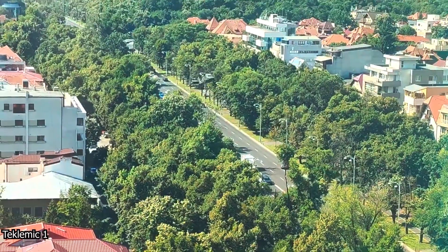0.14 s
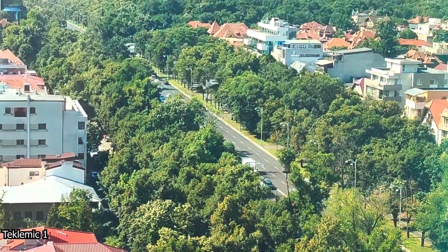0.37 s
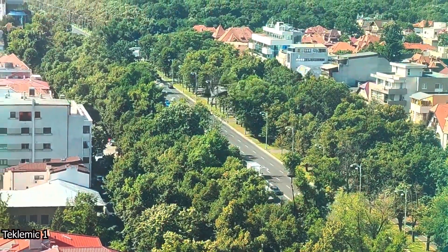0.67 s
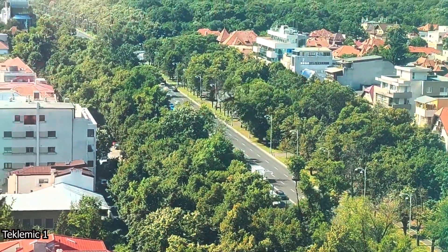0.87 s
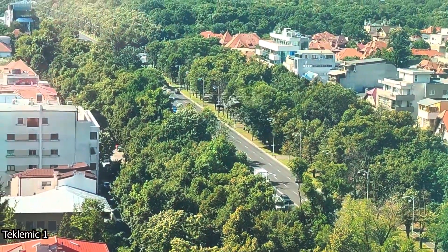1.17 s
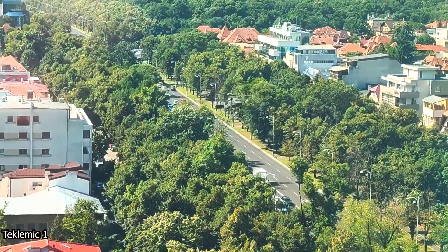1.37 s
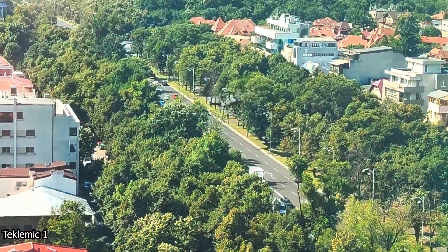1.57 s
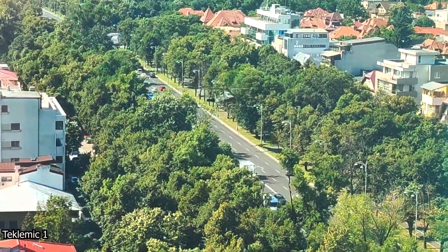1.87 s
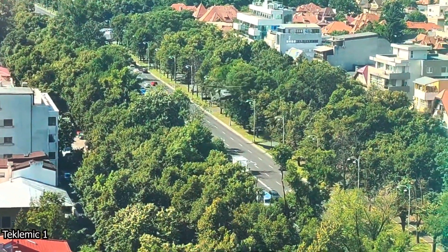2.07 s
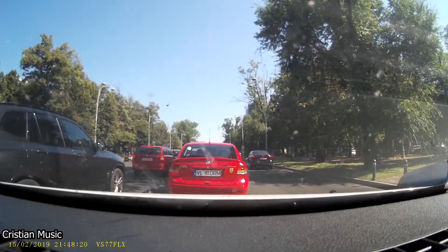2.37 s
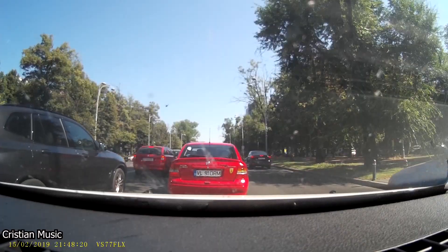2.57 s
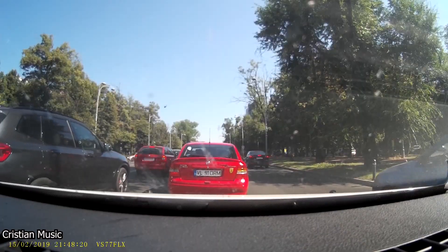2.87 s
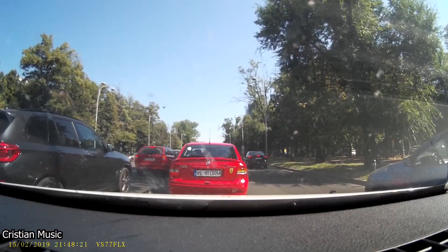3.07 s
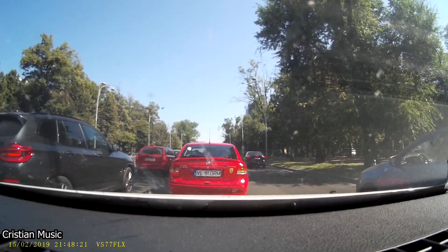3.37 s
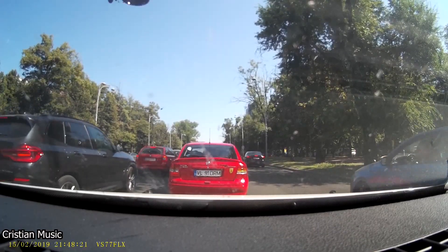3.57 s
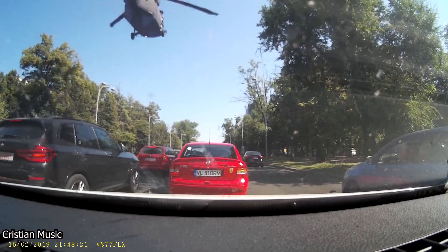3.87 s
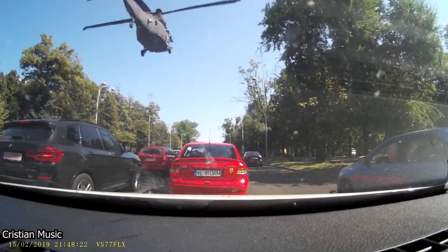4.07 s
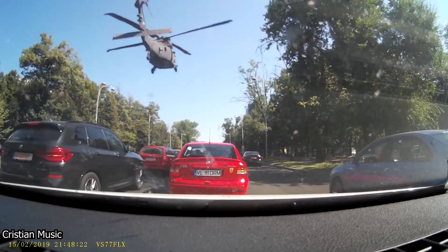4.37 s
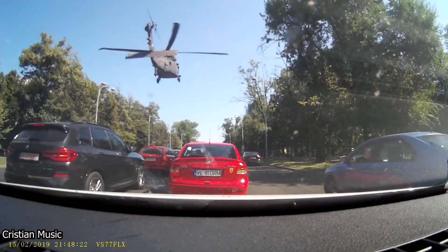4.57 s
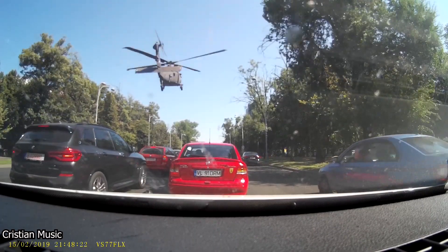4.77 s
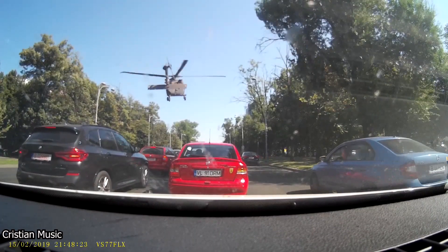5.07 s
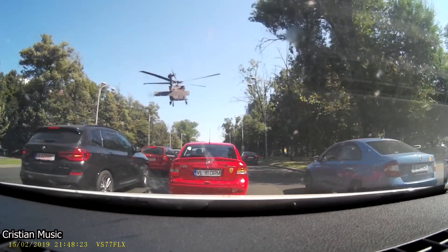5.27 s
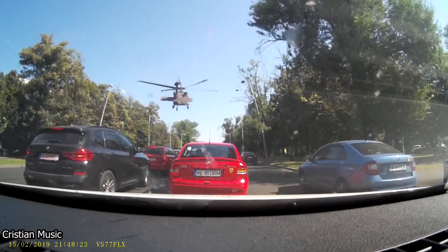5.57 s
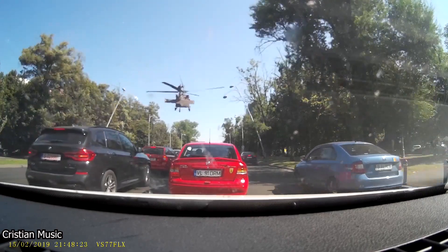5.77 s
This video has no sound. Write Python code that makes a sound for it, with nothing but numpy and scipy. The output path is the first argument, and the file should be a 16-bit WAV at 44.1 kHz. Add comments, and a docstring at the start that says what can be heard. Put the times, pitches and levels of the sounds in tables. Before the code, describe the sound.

From a high balcony, a soft low helicopter drone wavers over wide, quiet city hush, with a small click or two near the microphone. A hard cut jumps inside a car: very loud, rapid blade slaps and deep cabin boom overhead, with turbine whine and a swelling hiss of downwash. The machine passes and fades into duller rumble with faint high chirps and late crackles.

```python
"""A helicopter flies low over a tree-lined street: a far drone over city hush, then a hard cut to a close pass.
The far part is stereo, from a balcony: wavering sines for drone and whistle, shaped noise for hush, clicks.
The near part is mono, inside a car, as the machine passes overhead and recedes: sine orders for thump and tail
rotor, short ringing pulses for blade slap, blade-pushed noise for rumble, roar and turbine whine,
swelling noise for gusts of hiss, and short chirps for squeaks."""
import sys
import numpy as np
from scipy import signal
from scipy.io import wavfile
from scipy.ndimage import uniform_filter1d

SR = 44100
rng = np.random.default_rng(int(sys.argv[2]) if len(sys.argv) > 2 else 0)


def generate_wav(sig):
    """Save sig (samples, or channels by samples) to the path in sys.argv[1] as 16-bit PCM at SR."""
    pcm = np.round(np.clip(np.atleast_2d(sig).T, -1, 1) * 32767).astype(np.int16)
    wavfile.write(sys.argv[1], SR, pcm)


N = 262042
CUT_S = 2.2735  # the far part gives way to the car


def gain_of(db):
    """Decibels to gain."""
    return 10 ** (np.asarray(db) / 20)


def evened(x):
    """Scales to rms 1."""
    return x / np.sqrt(np.mean(x ** 2) + 1e-20)


def peaked(x):
    """Scales to peak 1."""
    return x / np.max(abs(x))


def read(points, hz):
    """Reads a spectrum on a log-frequency axis."""
    f, value = np.transpose(points)
    return np.interp(np.log(hz + 1), np.log(f + 1), value)


def columns(rows):
    """Every column of a curve table at every sample."""
    s, *cols = np.transpose(rows)
    return [np.interp(np.arange(N) / SR, s, c) for c in cols]


def add(mix, s, sound):
    """Adds a sound at a time in seconds."""
    part = mix[round(s * SR):][:len(sound)]
    part += sound[:len(part)]


def drift(hz):
    """Random wander of rms 1, summed from sines up to the given rate."""
    t = np.arange(N) / SR
    rates = hz * np.geomspace(.05, 1, num=16)
    return evened(sum(np.sin(2 * np.pi * (f * t + rng.random())) / np.sqrt(f) for f in rates))


def noise(spectrum, patchy_db, size, same=((1, 1), (20000, 1)), lead=((1, 0), (20000, 0))):
    """Two channels of random short-time spectra with drifting patches, set to rms 1 overall."""
    hop = size // 4
    hz = np.fft.rfftfreq(size, 1 / SR)
    a, b, c, d, patches = rng.standard_normal((N // hop + 5, len(hz), 5)).T
    patches = uniform_filter1d(patches, size=10, axis=0)
    patches = evened(uniform_filter1d(patches, size=10, axis=1))
    left, other = a + 1j * b, c + 1j * d
    alike = np.clip(read(same, hz), -1, 1)[:, None]
    late = np.exp(-1j * read(lead, hz))[:, None]
    right = alike * late * left + np.sqrt(1 - alike ** 2) * other
    inside = (hz >= spectrum[0][0]) & (hz <= spectrum[-1][0])
    shape = gain_of(read(spectrum, hz)[:, None] + patchy_db * patches) * inside[:, None]
    z = np.array([left, right]) * shape
    return evened(signal.istft(z, nperseg=size, noverlap=size - hop)[1][:, :N])


def tone(turns, db, waver=0.):
    """A sine of given rms level whose phase can wander, as through moving air."""
    return np.sqrt(2) * gain_of(db) * np.cos(2 * np.pi * turns + waver * drift(12.))


def passing(near, gone, half_s):
    """Slides from the overhead value to the receded one, half way at half_s."""
    slide_s = 0.26
    return gone + (near - gone) / (1 + np.exp((np.arange(N) / SR - half_s) / slide_s))


def blade_turns():
    """Blade passes counted from the cut; Doppler shift lowers their rate as the machine passes."""
    # pace of the main rotor: (time [s], blade passes [1/s])
    blade_rate = [(2.27, 17.75), (2.9, 17.6), (3.5, 16.93), (3.8, 16.87), (4.3, 16.84), (5.2, 16.66),
                  (5.94, 16.5)]
    in_car = np.arange(N) >= CUT_S * SR
    return np.cumsum(columns(blade_rate)[0] * in_car) / SR


def blade_thump():
    """The main rotor's periodic push: six clean harmonics of the blade rate."""
    # third order booming in the cabin: (time [s], level [dB])
    boom = [(2.27, -31), (2.575, -36), (2.775, -54), (2.975, -40), (3.2, -32), (3.95, -26), (4.6, -29.5),
            (5.6, -34), (5.94, -39)]
    boom_db = columns(boom)[0]
    fourth_db = -27.5 + 0.73 * boom_db  # follows the boom
    # the others drop away after the pass: level overhead [dB], gone [dB], half way [s]
    orders_db = (passing(-27, -52, 4), passing(-37.5, -50, 4.8), boom_db, fourth_db,
                 passing(-35.5, -50, 4.6), passing(-34, -59, 3.24))
    lags = (.1, -.2, -.1, .35, -.4, .1)  # in turns of each order
    turns = blade_turns()
    return sum(tone(k * turns - lag, db) for k, db, lag in zip(range(1, 7), orders_db, lags))


def blade_slaps():
    """A blade cutting a vortex: a cycle or two of sharp swing, then a short ring of the cabin."""
    # the loudest slaps: (centre time [s], peak level before rounding off [dB], swing frequency [Hz])
    slap_rows = [(2.279, -9.5, 232), (2.324, -3.5, 206), (2.373, -9.5, 240), (2.4423, -7.5, 169),
                 (2.487, -7.5, 205), (2.5451, -8, 178), (2.5996, -3, 264), (2.6551, -2, 200),
                 (2.714, -10.5, 190), (2.7874, -9.5, 238), (2.847, -17, 198), (3, -9, 212),
                 (3.06, -9.5, 237), (3.1122, -9.5, 210), (3.184, -18, 223), (3.2232, -13.5, 200),
                 (3.2812, -7.5, 268), (3.461, -14.5, 270), (3.536, -16.5, 244), (3.5788, -16.5, 258),
                 (3.6942, -16, 241), (3.987, -23, 272), (4.1118, -16, 190)]
    slap_s = 0.0097
    out = np.zeros(N)
    t = np.arange(-600, 1800) / SR
    for (s, db, hz), turn in zip(slap_rows, rng.uniform(-0.14, 0.32, len(slap_rows))):
        swing = np.exp(-.5 * (t / (0.25 * slap_s)) ** 2) * np.cos(2 * np.pi * (hz * t + turn))
        # an octave above, for a steepened front
        edge = 0.26 * np.exp(-.5 * (t / (0.2 * slap_s)) ** 2) * np.cos(2 * np.pi * (2 * hz * t + turn))
        ring = 0.61 * np.clip(t / 0.0058, 0, 1) * np.exp(-t / 0.014) * np.cos(2 * np.pi * 214.0 * t)
        add(out, s - 600 / SR, gain_of(db) * peaked(swing + edge + ring))
    return out


def rotor_wash():
    """Rumble, cabin roar, turbine whine and airy treble: noise bands that throb as each blade pushes them."""
    # loudness of the wash: (time [s], rumble level [dB], roar level [dB], whine level [dB])
    wash_levels = [(2.27, -18.5, -32.5, -46), (2.45, -21, -31, -44), (2.62, -20, -31.5, -44),
                   (2.76, -18.5, -30, -47), (2.9, -21.5, -29, -45.5), (3.2, -19.5, -31, -46.5),
                   (3.3, -17, -30.5, -50), (3.4, -25, -31, -49), (3.55, -21.5, -29, -45),
                   (3.7, -25, -32.5, -48.5), (3.95, -28, -34, -49.5), (4.3, -30.5, -36, -50.5),
                   (4.52, -30, -34, -50), (4.85, -31, -36.5, -50), (5.05, -34, -34, -48.5),
                   (5.4, -31.5, -34, -49.5), (5.94, -32, -34, -51)]
    # rumble colour, overhead then from behind, each of: (frequency [Hz], relative level [dB])
    rumble_spectra = ([(12, -36), (20, 0), (59, -14.5), (97, -5), (128, -1.5), (168, -3), (309, -9),
                       (422, -12), (483, -17.5), (612, -31), (700, -32.5), (910, -31), (1540, -120)],
                       [(41, -26), (70, 0), (76, 0.5), (124, -16.5), (171, 0), (270, -0.5), (321, -13),
                       (428, -4), (476, -7.5), (583, -9), (700, -12), (910, -25), (1540, -120)])
    # crossfade of the two colours: (time [s], share of the rumble heard from behind [0-1])
    behind_curve = [(2.27, 0), (3.3, 0.26), (3.9, 0.71), (4.6, 0.68), (5.94, 0.94)]
    # roar through the cabin: (frequency [Hz], relative level [dB])
    roar_spectrum = [(180, -15), (300, 0), (437, -3.5), (588, -4.5), (857, -8.5), (1510, -10), (2200, -28),
                     (2350, -26.5), (2700, -36), (3200, -38.5), (4160, -60), (7040, -120)]
    # turbine whine: (frequency [Hz], relative level [dB])
    whine_spectrum = [(1290, -7), (2200, -4.5), (2370, -4.5), (2620, -10), (3140, -9), (4160, 1.5),
                      (5220, -11), (5660, -11), (6270, -19.5), (6880, -17), (8000, -34), (10400, -53.5),
                      (17600, -120)]
    # airy treble: (frequency [Hz], relative level [dB])
    air_spectrum = [(2940, -47), (5000, -11.5), (5650, 0), (6220, -6), (7530, -5.5), (8420, -12.5),
                    (11300, -18), (12900, -24), (14100, -28), (16000, -47)]

    rumble_db, roar_db, whine_db = columns(wash_levels)
    throb = np.clip(passing(1., .2, 2.8), 0, 1)  # shallower once the machine has passed
    beat = throb * np.cos(2 * np.pi * (blade_turns() - .78))

    behind = np.clip(columns(behind_curve)[0], 0, 1)
    above, after = (noise(spectrum, patchy_db=1.0, size=4096)[0] for spectrum in rumble_spectra)
    rumble = np.sqrt(1 - behind) * above + np.sqrt(behind) * after
    rumble *= gain_of(rumble_db + 6.8 * beat)

    roar = gain_of(roar_db + 1.2 * beat) * noise(roar_spectrum, patchy_db=1.0, size=1024)[0]
    whine_db = whine_db + 1.5 * beat + 1.4 * drift(33.0) + 0.16 * drift(180.0)
    whine = gain_of(whine_db) * noise(whine_spectrum, patchy_db=1.0, size=512)[0]
    air_db = passing(-56, -67, 4) + 1.5 * beat + 1.4 * drift(11.0)
    air = gain_of(air_db) * noise(air_spectrum, patchy_db=2.0, size=512)[0]
    return rumble + roar + whine + air


def tail_rotor():
    """The tail rotor's second order booming in the cabin: one gliding, wavering sine."""
    # its glide and swell: (time [s], frequency [Hz], level [dB])
    tail_curve = [(2.27, 165.5, -35), (2.5, 165, -26), (3, 164.8, -19), (3.25, 162, -43.5),
                  (3.55, 160.5, -27), (3.9, 159, -37.5), (4.4, 158.5, -40.5), (5.94, 158, -52)]
    hz, db = columns(tail_curve)
    return tone(np.cumsum(hz) / SR, db + 2.5 * drift(10.), waver=.3)


def gusts():
    """Grainy downwash hiss that swells and fades, its treble a little late; a close reflection combs it."""
    # swells: (top reached at [s], hold [s], top level before the reflection [dB], fall [dB/s])
    gust_rows = [(3.45, .04, -31, 120), (4.75, .015, -53, 220)]
    # colour of each swell, one list apiece of: (frequency [Hz], relative level [dB])
    gust_spectra = [
        [(590, -24), (1000, -12), (1120, -16), (1370, -6.5), (1650, 0), (1960, -5.5), (2780, -21), (3190, -4),
         (3460, -16), (4020, 4), (4700, -8), (5970, -22.5), (7440, -20.5), (10300, -34), (12800, -27),
         (16000, -48)],
        [(2940, -32), (5000, -6), (6300, 2), (7200, 0), (8170, -17), (9100, -20), (9830, -12), (11000, -24),
         (14000, -23)],
    ]
    rise_db_per_s, treble_hz, treble_lag_s = 270, 5630, 0.013
    out, t = np.zeros(N), np.arange(N) / SR
    for (s, hold, db, fall_db), spectrum in zip(gust_rows, gust_spectra):
        below_db = rise_db_per_s * np.maximum(s - t, 0) + fall_db * np.maximum(t - s - hold, 0)
        level = gain_of(db - below_db + 0.79 * drift(80.))
        hiss = noise(spectrum, patchy_db=1.5, size=256)[0]
        body = signal.filtfilt(*signal.butter(2, treble_hz, fs=SR), hiss)
        treble = hiss - body
        out += level * body + np.interp(t - treble_lag_s, t, level) * treble
    return out + .3 * np.roll(out, shift=38)  # reflection, 38 samples late


def squeak_rows():
    """Every chirp of the trains, slightly uneven, and the lone ones."""
    # chirp trains, perhaps from a turning shaft of the aircraft: (first time [s], last time [s],
    # first gap [s], last gap [s], first and last frequency [Hz], first and last level [dB])
    trains = [(2.367, 3.33, .0528, .0528, 10950, 11500, -66, -63.5),
              (2.366, 3.13, .0526, .0526, 9550, 9570, -64.5, -63.5),
              (3.571, 5.91, .0548, .0559, 6770, 6810, -49.5, -66)]
    # lone chirps: (centre time [s], level before roughening [dB], frequency [Hz])
    lone = [(4.7792, -69, 9763), (5.0548, -61, 9723), (5.5045, -66, 9842)]
    jitter_s, spread_db, spread_hz = .002, 3, 60
    rows = list(lone)
    for first, last, gap0, gap1, hz0, hz1, db0, db1 in trains:
        u = np.linspace(0, 1, num=int(2 * (last - first) / (gap0 + gap1)) + 1)
        s = first + np.arange(len(u)) * (gap0 + .5 * (gap1 - gap0) * u)
        late, loud, high = rng.standard_normal((len(u), 3)).T
        db = db0 + (db1 - db0) * u + spread_db * loud
        hz = hz0 + (hz1 - hz0) * u + spread_hz * high
        rows += zip(s + jitter_s * late, db, hz)
    return rows


def squeaks():
    """Chirps of about 18 ms, rougher the higher they lie; the lower ones glide down."""
    out = np.zeros(N)
    u = np.linspace(0, 1, num=800)
    rows = squeak_rows()
    for (s, db, hz), rough in zip(rows, rng.standard_normal((len(rows), 2, 800))):
        high = np.clip((hz - 7500) / 3000, 0, 1)
        wobble = evened(uniform_filter1d(rough, size=40))
        glide = (.08 - .08 * high) * (.5 - u)
        flutter = (.01 + .012 * high) * wobble[0]
        turns = np.cumsum(hz * (1 + glide + flutter)) / SR
        shape = np.sin(np.pi * u) ** (2.5 - 1.1 * high) * (1 + (.25 + 0.55 * high) * wobble[1])
        add(out, s - 400 / SR, gain_of(db) * shape * np.sin(2 * np.pi * turns))
    return out


def crackles():
    """The whine spits: brief bursts of noise ringing near 4250 Hz."""
    # spits: (time [s], peak level [dB])
    spits = [(5.0589, -39), (5.4276, -34), (5.4929, -38), (5.5724, -40), (5.613, -38)]
    out = np.zeros(N)
    t = np.arange(700) / SR
    grain = np.hanning(160) * np.sin(2 * np.pi * 4250. * t[:160])
    for s, db in spits:
        ringing = evened(np.convolve(rng.standard_normal(800), grain, "same")[50:750])
        spit = (1 - np.exp(-t / 0.00082)) * np.exp(-t / 0.0061) * ringing
        add(out, s, gain_of(db) * peaked(spit))
    return out


def car_background():
    """Steady microphone hiss and a faint, steady electronic tone in the car."""
    # microphone hiss: (frequency [Hz], relative level [dB])
    car_hiss = [(5000, -28), (7500, -8), (10000, -5), (13000, -5), (15000, -9), (16000, -8)]
    hiss = gain_of(-72.5) * noise(car_hiss, patchy_db=1.2, size=512)[0]
    return hiss + tone(13599 * np.arange(N) / SR, -78)


def far_drone():
    """Low wavering sines, nearly the same in both ears, that swell and sink with the air."""
    # the two strongest tones: (time [s], lower tone level [dB], upper tone level [dB])
    main_levels = [(0.0, -59, -68), (0.19, -40, -48), (0.34, -52, -40), (0.57, -42, -45),
                   (0.64, -41, -38.5), (0.86, -60, -45), (1.1, -48, -40.5), (1.38, -40, -43),
                   (1.52, -40.5, -37), (2.04, -44, -42), (2.13, -42.5, -59), (2.2, -37, -35),
                   (2.27, -35, -42)]
    # drone tones beside the upper one, fading at random: (frequency [Hz], level relative to it [dB])
    side_tones = [(88., -14), (110.4, -12.5), (144.9, -21)]
    # weaker tones: (frequency [Hz], level [dB])
    faint_tones = [(36.5, -64), (73.2, -70), (167, -53.5), (221, -65.5), (269, -59.5), (495, -66),
                   (1642, -84), (2078, -92), (2223, -82), (3607, -91)]
    t = np.arange(N) / SR
    tones_db = columns(main_levels)
    drone = sum(tone(hz * t, db + 1.4 * drift(13.4), waver=0.5) for hz, db in zip((54.6, 126.8), tones_db))
    drone += sum(tone(hz * t, tones_db[1] + db + 5.4 * drift(4.24), waver=0.66) for hz, db in side_tones)
    drone += sum(tone(hz * t, db + 3.4 * drift(4.4), waver=1.75 + hz / 900) for hz, db in faint_tones)
    return np.array([drone * gain_of(-0.6), np.interp(t - .0003, t, drone)])  # reaches the left first


def far_whistle():
    """A thin wavering sine that comes and goes, stronger on the left."""
    # its swells: (time [s], level before panning [dB])
    whistle_curve = [(0, -84), (.4, -83), (.6, -94), (1., -86), (1.4, -94), (1.6, -82), (1.85, -87),
                     (1.95, -94), (2.27, -94)]
    db = columns(whistle_curve)[0] + 2.5 * drift(30.)
    return tone(3080 * np.arange(N) / SR, db, waver=1.8) * gain_of([[1.5], [-1.5]])


def hand_clicks():
    """Small clicks near the hand: decaying bursts of band noise, separate in each ear."""
    # clicks: (time [s], peak level before panning [dB], decay by 60 dB [s],
    # left over right [dB], centre frequency [Hz])
    click_rows = [(0.9018, -47.5, 0.067, 2.5, 5000), (1.039, -59, 0.04, -2, 5000)]
    out = np.zeros((2, N))
    t = np.arange(2500) / SR
    for s, db, t60, pan_db, hz in click_rows:
        band = signal.butter(1, [0.65 * hz, 1.35 * hz], "band", fs=SR)
        for side, sign in zip(out, (.5, -.5)):
            burst = evened(signal.lfilter(*band, rng.standard_normal(2500)))
            add(side, s, gain_of(db + sign * pan_db) * peaked(gain_of(-60 * t / t60) * burst))
    return out


def city_hush():
    """City and far rotor wash: wide low noise, rising as the machine draws nearer."""
    # colour: (frequency [Hz], relative level [dB])
    hush_spectrum = [(12, -37), (20, -21), (54, -8.5), (136, -5), (216, -23.5), (278, -15.5), (394, -27),
                     (485, -22.5), (702, -27.5), (788, -30.5), (947, -31.5), (1310, -40), (1980, -37.5),
                     (2620, -46.5), (5000, -64.5), (6500, -81), (11000, -120)]
    # stereo width: (frequency [Hz], left-right likeness [-1 to 1])
    hush_same = [(20, 1), (100, .995), (180, 0.95), (550, 0.45), (1650, -0.2), (4970, -0.083), (15000, 0)]
    # stereo phase: (frequency [Hz], lead of the left, negative where the right leads [rad])
    hush_lead = [(20, -0.13), (700, -0.28), (2000, -.5), (15000, 0)]
    start_db, rise_db_per_s = -46, 1.76
    level = gain_of(start_db + rise_db_per_s * np.arange(N) / SR)
    return level * noise(hush_spectrum, patchy_db=2.5, size=2048, same=hush_same, lead=hush_lead)


def far_mic_hiss():
    """Faint microphone hiss, independent in the two channels."""
    # colour: (frequency [Hz], relative level [dB])
    far_hiss = [(2060, -26), (3500, 0), (3660, -2.5), (3960, -5.5), (7790, -13), (8360, -18),
                (15100, -10.5), (15900, -17.5), (16400, -28)]
    return gain_of(-76) * noise(far_hiss, patchy_db=2.5, size=512, same=((1, 0), (20000, 0)))


def scene():
    """The far stereo view, then the car's single microphone; both are band-limited, the cut is hard."""
    car = blade_thump() + blade_slaps() + rotor_wash() + tail_rotor()
    car += gusts() + squeaks() + crackles() + car_background()
    far = far_drone() + far_whistle() + hand_clicks() + city_hush() + far_mic_hiss()
    limit = signal.firwin(511, 15750, window=("kaiser", 9), fs=SR)[None]  # low-pass, Hz
    far, car = (signal.oaconvolve(np.atleast_2d(view), limit, "same") for view in (far, car))
    return np.where(np.arange(N) < CUT_S * SR, far, car)


def record(dry):
    """Rounds off loud slaps below a ceiling, then low-passes the whole."""
    ceiling = .72
    soft = dry / (1 + abs(dry / ceiling) ** 8) ** (1 / 8)
    limit = signal.firwin(511, 16450, window=("kaiser", 9), fs=SR)[None]  # Hz
    return signal.oaconvolve(soft, limit, "same")


dry = scene()
out = record(dry)
generate_wav(out)
```